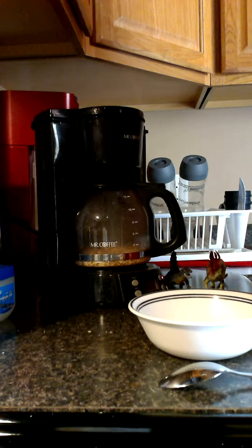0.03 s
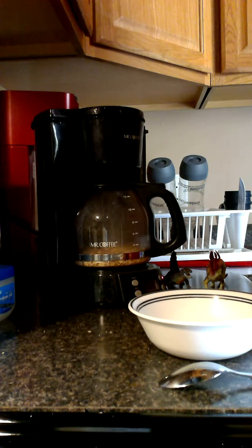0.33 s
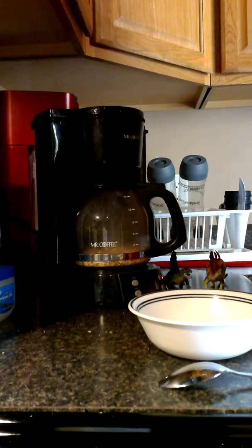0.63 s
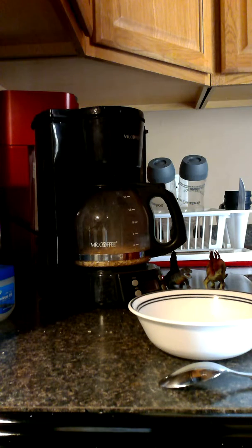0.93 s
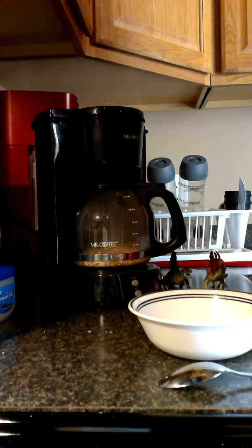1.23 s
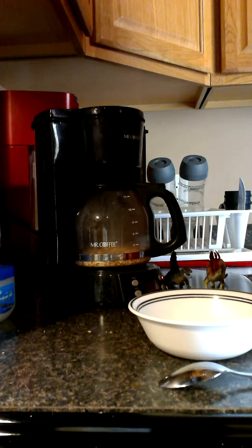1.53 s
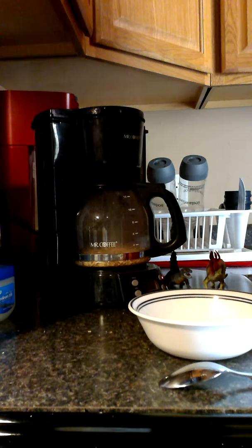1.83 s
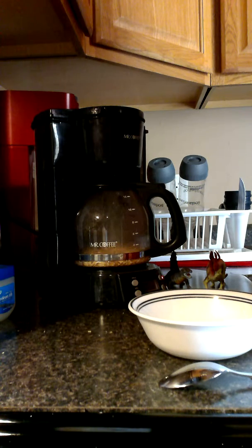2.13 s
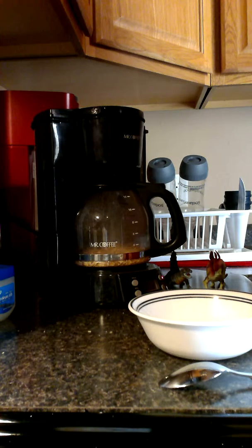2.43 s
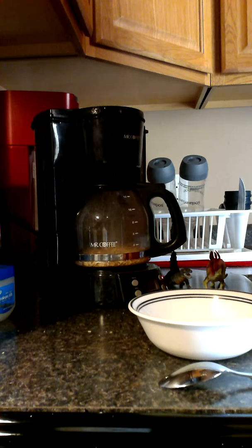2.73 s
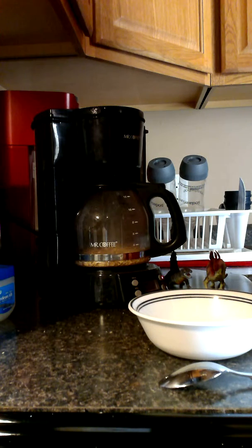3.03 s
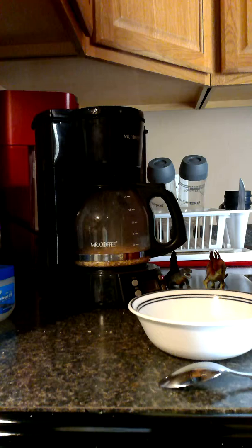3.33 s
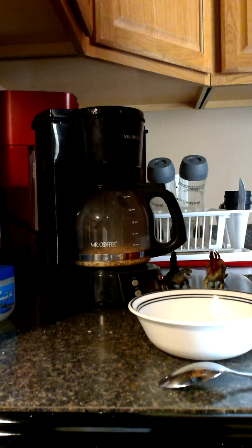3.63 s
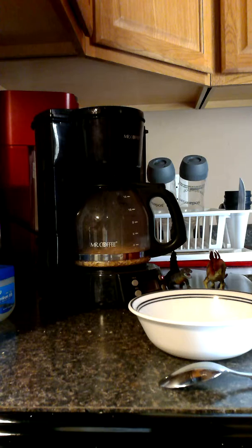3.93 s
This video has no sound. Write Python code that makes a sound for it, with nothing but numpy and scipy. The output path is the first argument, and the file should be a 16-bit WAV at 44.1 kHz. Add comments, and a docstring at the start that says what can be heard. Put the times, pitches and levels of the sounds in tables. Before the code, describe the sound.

A drip coffeemaker gurgles as it brews, its low, hollow bubbles popping in uneven clusters with light ticks and spatter. Faint steam puffs come and go. It is heard close, slightly to the right, in a quiet kitchen.

```python
"""A stone kitchen counter under cabinets: a drip coffeemaker brews, a little to the right.
Steam bubbles burst in its water tube in uneven clusters; each thumps the hollow plastic housing,
sets the tube ringing thinly and throws spatter. Steam puffs and water squelches from the spout.
Wall, counter and cabinets reflect closely. Faint tones come and go over quiet room noise."""
import sys
import numpy as np
from scipy import signal
from scipy.fft import rfft, irfft
from scipy.io import wavfile
from scipy.ndimage import uniform_filter1d

SR = 44100
rng = np.random.default_rng(int(sys.argv[2]) if len(sys.argv) > 2 else 0)


def digitize_waveform(pressure):
    """Quantize a signal to 16-bit integers and store it at the path in sys.argv[1].

    Rows of a 2-D input are taken as channels; values are limited to [-1, 1].
    """
    field = np.atleast_2d(pressure).T
    bounded = np.clip(field, -1, 1)
    quanta = np.round(bounded * 32767).astype(np.int16)
    wavfile.write(sys.argv[1], SR, quanta)


N = 176400
T = np.arange(N) / SR


def amp(db):
    """Decibels to gain."""
    return 10 ** (np.asarray(db) / 20)


def unit(x):
    """Scales to rms 1."""
    return x / np.sqrt(np.mean(x ** 2) + 1e-20)


def lookup(curve, hz):
    """Interpolates a table on a log-frequency axis."""
    knots_hz, values = np.transpose(curve)
    return np.interp(np.log(hz + 1), np.log(knots_hz + 1), values)


def colour(x, curve, db_scale=1):
    """Filters by a table of dB over frequency."""
    hz = np.fft.rfftfreq(2 * N, 1 / SR)
    return irfft(rfft(x, 2 * N) * amp(db_scale * lookup(curve, hz)))[..., :N]


def convolve(x, responses):
    """Passes mono x through one impulse response per channel."""
    return signal.fftconvolve(np.atleast_2d(x), responses, axes=1)[:, :N]


def grains(per_s, spread_db):
    """Random clicks of uneven size, rms 1."""
    clicks = (rng.random(N) < per_s / SR) * rng.choice([-1, 1], N)
    return unit(clicks * amp(spread_db * np.minimum(rng.exponential(1, N), 3)))


def add_bubble(mix, s, db, hz, decay_s=0.0045, push_hz=423, onset_cycles=0.36):
    """One bubble: a short push of air and a swing at its own pitch that holds, then stops short."""
    a, b = np.clip([int((s - 0.01) * SR), int((s + 0.06) * SR)], 0, N)
    t = T[a:b] - s
    u = np.pi * push_hz * t
    push = np.sqrt(hz / push_hz) * (1 - 3 * u ** 2) / (1 + u ** 2) ** 3
    rise = np.exp(-(np.minimum(t, 0) * hz / onset_cycles) ** 2)
    fall = np.exp(-(np.maximum(t, 0) / decay_s) ** 1.5)
    mix[a:b] += amp(db) * (push + rise * fall * np.cos(2 * np.pi * hz * t))


# Bursting bubbles. Each row: time in seconds, relative level in dB, pitch in Hz, decay in seconds.
BUBBLES = [(0.0203, -33, 240, 0.0053), (0.1266, -36, 207, 0.013), (0.1749, -38, 560, 0.0052),
           (0.1802, -38, 491.0, 0.0017), (0.1888, -35.5, 216, 0.013), (0.2199, -32.5, 240, 0.0045),
           (0.2323, -37, 240, 0.018), (0.2419, -36, 485, 0.0047), (0.3023, -33.5, 188, 0.0061),
           (0.325, -35.5, 234, 0.0091), (0.3664, -34.5, 481, 0.0056), (0.3714, -42, 388, 0.009),
           (0.4233, -39.5, 222.0, 0.014), (0.428, -40.5, 600, 0.0055), (0.4375, -45, 417, 0.017),
           (0.4547, -37.0, 220, 0.011), (0.4601, -37, 370, 0.013), (0.465, -40, 462, 0.007),
           (0.4871, -38.5, 266, 0.014), (0.548, -44.5, 241, 0.022), (0.58, -37, 208, 0.0084),
           (0.6434, -34.5, 220, 0.0097), (0.6879, -38, 420, 0.0045), (0.6956, -35.5, 217, 0.0076),
           (0.7708, -36.5, 227, 0.0093), (0.7715, -35.5, 494, 0.0024), (0.7938, -41.5, 388, 0.012),
           (0.7977, -35, 237, 0.013), (0.8622, -38.5, 560, 0.0078), (0.8692, -34, 218, 0.0098),
           (0.8788, -45, 459, 0.007), (0.9081, -35.5, 223, 0.016), (1.0309, -32.5, 219, 0.006),
           (1.0449, -33.5, 231, 0.012), (1.0998, -35.5, 224, 0.013), (1.1637, -38, 195, 0.0056),
           (1.1648, -41, 472, 0.0046), (1.2508, -35, 216, 0.02), (1.277, -37, 219, 0.012),
           (1.2856, -34.5, 485, 0.011), (1.2904, -39, 419.0, 0.014), (1.2989, -37.5, 190, 0.0064),
           (1.3097, -37, 370, 0.0032), (1.4087, -31.5, 239, 0.0052), (1.4142, -38.5, 330, 0.0038),
           (1.4387, -36.5, 414, 0.0067), (1.4708, -35, 207, 0.012), (1.5432, -38.5, 400, 0.0026),
           (1.5799, -37, 491.0, 0.0052), (1.5897, -38.5, 270, 0.009), (1.6027, -37, 183, 0.013),
           (1.6282, -36.0, 233, 0.012), (1.6503, -36.5, 497, 0.0051), (1.711, -44, 216, 0.037),
           (1.7711, -36, 488, 0.0042), (1.7756, -41.5, 262, 0.013), (1.8186, -35, 207, 0.0083),
           (1.8709, -38.5, 224, 0.016), (1.9128, -34.5, 222.0, 0.012), (2.028, -34.5, 377.0, 0.0043),
           (2.0321, -37, 210.0, 0.0093), (2.0417, -40, 483, 0.007), (2.0473, -44, 231, 0.016),
           (2.097, -40, 231, 0.011), (2.1154, -35, 538, 0.0035), (2.1237, -38, 203, 0.0074),
           (2.1339, -42.5, 534, 0.002), (2.1668, -35.5, 203, 0.0055), (2.242, -39.5, 221, 0.034),
           (2.318, -35, 209, 0.018), (2.3278, -37, 477, 0.0015), (2.3704, -41, 211, 0.012),
           (2.3934, -38, 230, 0.016), (2.4289, -36.5, 224, 0.011), (2.4698, -33.5, 232, 0.013),
           (2.5526, -46.5, 487, 0.007), (2.5561, -36.5, 477, 0.0016), (2.5571, -36, 220, 0.014),
           (2.7311, -33, 487, 0.0074), (2.736, -38.5, 407, 0.0054), (2.7601, -36.5, 232, 0.012),
           (2.7657, -39.5, 347, 0.0078), (2.7991, -33.5, 214, 0.0036), (2.8185, -36.5, 214, 0.011),
           (2.9051, -38, 410, 0.0032), (2.913, -35, 240, 0.013), (2.9746, -38, 183, 0.013),
           (2.9796, -35.5, 255, 0.015), (3.0068, -40.0, 506, 0.0098), (3.0115, -32.5, 229, 0.014),
           (3.0851, -35, 216, 0.0086), (3.191, -40.0, 390, 0.012), (3.2009, -40.5, 483, 0.01),
           (3.2169, -41.0, 224, 0.02), (3.2407, -34.5, 220, 0.01), (3.267, -39, 402, 0.0028),
           (3.3588, -34.5, 208, 0.015), (3.4079, -34, 501, 0.0086), (3.4127, -49, 418, 0.029),
           (3.4353, -40.5, 480, 0.0076), (3.4405, -36.5, 235, 0.018), (3.4477, -43, 594, 0.0059),
           (3.5563, -37, 490, 0.0077), (3.5615, -35.5, 390, 0.007), (3.6211, -38, 607.0, 0.0056),
           (3.6252, -32.5, 200, 0.01), (3.7477, -33, 388, 0.0055), (3.7558, -37.5, 226, 0.0075),
           (3.839, -33.5, 432, 0.00071), (3.8908, -37, 235, 0.01), (3.8957, -38, 353, 0.007),
           (3.927, -40, 464, 0.0026), (3.9901, -39.5, 222.0, 0.022)]
def boiling(simmer_per_s=100, simmer_db=-55, simmer_hz=320):
    """Steam bubbles burst in the tube, each trailed by two small ones, over a steady simmer."""
    out = np.zeros(N)
    for s, db, hz, decay_s in BUBBLES:
        add_bubble(out, s, db + 0.5, hz, decay_s)
        for lag, pitch in rng.random((2, 2)):
            delay_s = 0.0049 + 0.0171 * lag
            add_bubble(out, s + delay_s, db - 9, hz * np.exp(0.666 * (2 * pitch - 1)))
    candidates = 800
    for when, chance, size, pitch in rng.random((candidates, 4)):
        if chance < simmer_per_s * T[-1] / candidates:
            hz = simmer_hz * 2 ** (2 * pitch - 1)
            add_bubble(out, when * T[-1], simmer_db + 12 * (size - 0.5), hz)
    return out


# Housing response. Each row: frequency in Hz, gain in dB.
HOUSING_EQ = [(40, -25.5), (90, 3), (150, -2.5), (230, -1), (300, -1.5), (380, 0), (500, 2.5), (620, 3),
              (730, -5.5), (860, 3.5), (1080, -8), (1350, -4), (1800, 14.5), (3000, 7)]
# Cavity modes. Each row: frequency in Hz, gain in dB, T60 in seconds.
HOUSING_MODES = [(235, -21, 0.077), (411.5, -24, 0.5), (475, -12, 0.45), (531, -1, 0.59), (603, -2.5, 0.36),
                 (658, 6, 0.6), (834, -4.5, 0.015)]
def housing_thumps(bubbles):
    """Bubbles thump the plastic housing, which rings hollow and sounds into the kitchen."""
    thumps = colour(bubbles, HOUSING_EQ)
    t = T[:SR // 2]
    modes = np.zeros(len(t))
    for hz, db, t60_s in HOUSING_MODES:
        damping = np.log(1000) / t60_s
        modes += amp(db) * 2 * damping / SR * np.exp(-damping * t) * np.cos(2 * np.pi * hz * t)
    close = near_field(thumps, echo_gain=0.58) + convolve(thumps, modes[None])
    return close + amp(-12) * room_tail(thumps, onset_s=0.0097)


def ping(s, db, hz, rise_s=0.00076, decay_s=0.0073):
    """One struck resonance: a damped sine."""
    out = np.zeros(N)
    part = out[round(s * SR):][:SR // 10]
    t = T[:len(part)]
    part += amp(db) * (1 - np.exp(-t / rise_s)) * np.exp(-t / decay_s) * np.sin(2 * np.pi * hz * t)
    return out


# Strikes on the tube. Each row: start in seconds, relative level in dB, pitch in Hz.
CLINKS = [(0.019, -57.5, 3190), (0.1803, -51.5, 3110), (0.244, -56.5, 3200.0), (0.364, -62, 3060),
          (0.4331, -53.5, 3110), (0.4395, -53, 3130), (0.4707, -52, 3170), (0.6317, -57, 3210),
          (0.686, -53, 3210), (0.6899, -55.5, 3120), (0.7692, -50.5, 3220), (0.8634, -53.5, 3260),
          (0.8747, -57.5, 3150), (0.9087, -56.5, 3170), (1.0431, -50, 3186), (1.1, -57.5, 3140),
          (1.289, -48.5, 3160), (1.2987, -58, 3205.0), (1.409, -52, 3280), (1.4398, -51, 3250),
          (1.4505, -50.5, 3225), (1.5397, -49, 3310), (1.5786, -47.5, 3220), (1.6503, -50, 3195.0),
          (1.7734, -53.5, 3240), (1.9616, -54, 3180), (2.027, -56, 3195.0), (2.0399, -54.0, 3135),
          (2.1156, -51.5, 3130), (2.292, -55, 3195.0), (2.3092, -55.5, 3230), (2.556, -54, 3222),
          (2.7308, -52.5, 3160), (2.7616, -55, 3170), (2.7657, -59, 3160), (2.7927, -54, 3130),
          (2.9354, -55.5, 3170), (2.9754, -48.5, 3250), (2.9805, -48.5, 3200), (3.009, -56, 3205.0),
          (3.1898, -54, 3195.0), (3.1985, -48, 3220.0), (3.2067, -53.5, 3330), (3.2394, -48.5, 3210),
          (3.4096, -47.5, 3190), (3.435, -48.5, 3230), (3.4465, -55.5, 3140), (3.5582, -57, 3215),
          (3.6242, -50, 3240), (3.75, -63, 3160.0), (3.8384, -46.5, 3200), (3.889, -55, 3305),
          (3.9136, -53, 3170)]
def clinks():
    """The tube clinks as bursts strike it."""
    return sum(ping(s, db + 5, hz) for s, db, hz in CLINKS)


def blips(max_delay_s=0.018, range_hz=(1150, 1950)):
    """A tiny bubble blips just after each clink."""
    return sum(ping(s + rng.uniform(0, max_delay_s), db - 1, rng.uniform(*range_hz))
               for s, db, _ in CLINKS)


def burst_force(decay_s, bubble_gain_db=-23.5):
    """Force of the bursting films: a jump at each bubble and clink, then a quick decay."""
    jumps = np.zeros(N)
    for s, db, *_ in BUBBLES:
        jumps[round(s * SR)] += amp(db + bubble_gain_db) ** 2
    for s, db, _ in CLINKS:
        jumps[round(s * SR)] += amp(db) ** 2
    power = signal.lfilter([1], [1, -np.exp(-2 / (decay_s * SR))], jumps)
    return np.sqrt(power + 1e-20)


# Droplet spectrum. Each row: frequency in Hz, relative level in dB.
SPATTER_EQ = [(600, 1), (1000, 3.5), (1300, 2), (1750, 2), (2050, -5), (2650, -17.5), (3600, -7),
              (4700, -14), (6500, -17.5), (9000, -47), (16000, -53)]
def spatter():
    """Droplets from each burst patter on the plastic."""
    patter = unit(colour(grains(per_s=600, spread_db=-1.5), SPATTER_EQ))
    return amp(0.5) * patter * burst_force(decay_s=0.011)


# Tube resonances. Each row: frequency in Hz, bandwidth in Hz, relative level in dB.
TUBE_MODES = [(3210, 70, 0), (3790, 100, -12), (2210, 60, -12)]
def tube_ring(steady_db=-72.5):
    """Droplets keep the tube ringing faintly, harder at each burst."""
    force = amp(-3) * burst_force(decay_s=0.0038) + amp(steady_db)
    drive = grains(per_s=3000, spread_db=3.5) * force
    t = T[:SR // 10]
    response = sum(amp(db) * np.sqrt(width) * np.exp(-np.pi * width * t) * np.sin(2 * np.pi * hz * t)
                   for hz, width, db in TUBE_MODES)
    return signal.fftconvolve(drive, response / np.linalg.norm(response))[:N]


# Drop impacts. Each row: start in seconds, relative level in dB.
TICKS = [(.1795, -54), (.2, -70), (.369, -64), (.44, -57), (.69, -62), (.865, -59), (1.042, -56.5),
         (1.099, -58.5), (1.314, -59), (1.58, -59), (1.652, -74), (2.732, -60), (3.838, -62)]
# Modes of the plastic. Each row: frequency in Hz, gain in dB.
PLASTIC_MODES = [(3760, 3), (4200, -8), (4680, 0), (5540, -15), (6330, -3)]
def ticks(spread_db=2, detune=0.0084):
    """Drops tick on the plastic, ringing it a little differently each time."""
    out = np.zeros(N)
    for s, db in TICKS:
        for hz, mode_db in PLASTIC_MODES:
            level_db = db + mode_db + spread_db * rng.standard_normal()
            out += ping(s, level_db, hz * (1 + detune * rng.standard_normal()))
    return out


# Spout squelches. Each row: start in seconds, peak level in dB, centre pitch in Hz.
SQUELCHES = [(0.645, -48, 1536), (1.313, -49, 1650), (2.06, -55, 1570), (2.3, -51.5, 1446),
             (2.798, -54, 1830), (2.981, -48, 1756)]
def squelches(length_s=0.02, glide=0.043, roughness=0.089):
    """Water squeezed through the spout gives short, rough, slightly rising whistles."""
    out = np.zeros(N)
    progress = np.linspace(0, 1, round(length_s * SR))
    swell = np.sin(np.pi * progress ** 0.71)
    for s, db, hz in SQUELCHES:
        waver = unit(uniform_filter1d(rng.standard_normal(SR // 5), size=60))[:len(swell)]
        pitch_hz = hz * (1 + glide * (progress - 0.5) + roughness * waver)
        whistle = np.sin(2 * np.pi * np.cumsum(pitch_hz) / SR)
        out[round(s * SR):][:len(swell)] += amp(db) * swell * whistle
    return out


# Steam puffs. Each row: start and length in seconds, then relative sputter, hiss and fizz in dB.
PUFFS = [(0.169, 0.043, -57, -88, -75), (0.312, 0.048, -61, -77.5, -84), (0.423, 0.044, -63, -79, -76),
         (0.635, 0.026, -53, -72, -74), (0.87, 0.029, -62, -87, -84), (1.032, 0.0087, -66, -87, -80),
         (1.16, 0.037, -65, -76, -70), (1.296, 0.029, -58, -70.5, -71), (1.355, 0.062, -64.5, -72, -65.5),
         (1.408, 0.056, -76, -75.5, -79), (1.52, 0.087, -60, -77.5, -91), (1.949, 0.019, -67, -63.5, -70),
         (2.041, 0.015, -54.5, -67.5, -73), (2.292, 0.031, -57.5, -70, -72),
         (2.788, 0.012, -52.5, -75, -78), (2.968, 0.028, -53, -69, -71), (3.194, 0.007, -51.5, -57.5, -58),
         (3.374, 0.044, -61.5, -69, -85), (3.558, 0.013, -51, -67, -68), (3.621, 0.079, -67, -80, -74),
         (3.688, 0.04, -60, -68, -65.5), (3.739, 0.12, -63.5, -81, -73.5)]
# Spectra of the three parts. Each row: frequency in Hz, relative level in dB.
SPUTTER_EQ = [(400, -17), (1000, -2.5), (1600, -4.5), (2300, -6), (3200, -14.5), (4500, -21), (9000, -55)]
HISS_EQ = [(1500, -7), (3000, -9.5), (3900, 7), (5400, 1.5), (6900, 3.5), (8500, -22), (16000, -37)]
FIZZ_EQ = [(3000, -18), (6000, 2), (7500, 6.5), (10000, 8), (12500, 2.5), (15000, 4.5)]
def steam_puffs(rise_s=0.0052, fall_s=0.011):
    """Steam leaves the spout in puffs of wet sputter, hiss and fizz that rise fast, hold and die."""
    out = np.zeros(N)
    for part, (spectrum, gain_db) in enumerate([(SPUTTER_EQ, 0.5), (HISS_EQ, 9.5), (FIZZ_EQ, 7)]):
        power = np.zeros(N)
        for s, length_s, *levels_db in PUFFS:
            rise = np.clip((T - s) / rise_s, 0, 1)
            fall = np.exp(-np.maximum(T - s - 0.84 * length_s, 0) / fall_s)
            power += (amp(levels_db[part]) * rise * fall) ** 2
        noise = unit(colour(grains(per_s=4500, spread_db=2.5), spectrum))
        out += amp(gain_db) * np.sqrt(power) * noise
    return out


# Course of the jet. Each row: time in seconds, band centre in Hz, level in dB.
JET_PATH = [(1.349, 7470, -90), (1.362, 7400, -62), (1.385, 7000, -69), (1.405, 5200, -69),
            (1.46, 4750, -64.5), (1.54, 4100, -72), (1.6, 4040, -90)]
def steam_jet(width_hz=1500):
    """One long, sputtering jet whose hiss sinks as the pressure falls."""
    s, hz, db = np.transpose(JET_PATH)
    pole = np.exp(-np.pi * width_hz / SR)
    baseband = signal.lfilter([1], [1, -2 * pole, pole ** 2], grains(per_s=2900, spread_db=-2))
    carrier = np.cos(2 * np.pi * np.cumsum(np.interp(T, s, hz)) / SR)
    return unit(baseband * carrier) * np.interp(T, s, amp(db), left=0, right=0)


# Reflections at each microphone. Each row: delay in seconds, relative gain.
ECHOES_LEFT = [(.0023, 0.31), (.0031, -0.31), (.0047, 0.38), (.0083, 0.35), (.01, 0.19), (.0125, 0.18),
               (.0167, 0.25), (.0186, 0.22)]
ECHOES_RIGHT = [(.0028, -0.019), (.0051, 0.58), (.0064, 0.091), (.0083, 0.11), (.0099, -0.24),
                (0.0103, 0.2), (0.0187, 0.22), (0.023, 0.15)]
def near_field(x, echo_gain, direct_gain=0.8):
    """Direct sound plus single reflections from counter, wall and cabinets."""
    taps = np.zeros((2, SR // 20))
    taps[:, 0] = direct_gain
    for side, echoes in enumerate((ECHOES_LEFT, ECHOES_RIGHT)):
        for delay_s, gain in echoes:
            taps[side, round(delay_s * SR)] += echo_gain * gain
    return convolve(x, taps)


# Kitchen decay. Each row: frequency in Hz, T60 in seconds.
ROOM_T60 = [(100, 1), (250, 0.7), (1000, 0.51), (3200, 0.47), (8000, 0.23), (16000, 0.4)]
def room_tail(x, onset_s):
    """Diffuse reverberation, each band dying at its own rate."""
    hz, t, bands = signal.stft(diffuse_noise()[:, :SR // 2], SR, nperseg=256)
    decay = amp(-60 * t / lookup(ROOM_T60, hz)[:, None])
    _, tail = signal.istft(bands * decay, SR, nperseg=256)
    tail *= np.minimum(T[:tail.shape[1]] / onset_s, 1) ** 2
    return convolve(x, tail / np.linalg.norm(tail[0]))


# Stereo balance. Each row: frequency in Hz, leftward bias in dB before scaling per side.
BALANCE = [(100, -3), (230, 0), (400, -5.5), (490, 3.5), (580, -7), (900, -8), (1250, 1.5), (1800, -4),
           (3200, -7), (4500, -5.5), (8000, -10.5), (15000, -2)]
def lean_right(stereo):
    """Most bands reach the right microphone louder."""
    left, right = stereo
    return np.array([colour(left, BALANCE, db_scale=0.68), colour(right, BALANCE, db_scale=-0.42)])


# Tones under the bubbling. Each row: start in seconds, length in seconds, level in dB, pitch in Hz.
TONES = [(2.199, 0.98, -61, 335), (3.14, 1.7, -62.5, 703), (0, 0.63, -64.5, 706),
         (2.202, 0.46, -69.5, 1326), (2.327, 0.12, -69, 1673), (2.83, 0.4, -71, 1660)]
def faint_tones(waver_hz=2.36):
    """Slightly wavering tones fade in and out."""
    out = np.zeros(N)
    for s, length_s, db, hz in TONES:
        pitch_hz = hz + waver_hz * unit(uniform_filter1d(rng.standard_normal(N), size=3000))
        tone = unit(np.sin(2 * np.pi * np.cumsum(pitch_hz) / SR))
        progress = np.clip((T - s) / length_s, 0, 1)
        out += amp(db) * tone * np.sqrt(abs(np.sin(np.pi * progress)))
    return out


# Room sound field. Each row: frequency in Hz, left-right correlation from 0 to 1.
CORRELATION = [(20, 0.85), (100, 1), (300, 0.97), (700, 0.012), (1500, 0.67), (4000, 0), (16000, 0)]
def diffuse_noise():
    """Stereo noise, alike in the bass and unrelated in the treble."""
    left, other = rfft(rng.standard_normal((2, N)))
    shared = lookup(CORRELATION, np.fft.rfftfreq(N, 1 / SR))
    right = shared * left + np.sqrt(1 - shared ** 2) * other
    return irfft(np.array([left, right]), N)


# Noise floor. Each row: frequency in Hz, relative level in dB.
FLOOR_EQ = [(10, 1.9), (22, 8), (48, -5), (90, -4), (160, -1), (220, 0.7), (300, -8), (480, -3), (800, -9),
            (1100, -15), (1700, -15), (2600, -23), (4000, -22), (8000, -25), (15500, -24)]
def background(floor_db=-59.5, whine_db=-90, whine_hz=14700):
    """Room rumble, microphone hiss and a very faint high whine."""
    floor = amp(floor_db) * unit(colour(diffuse_noise(), FLOOR_EQ))
    return floor + amp(whine_db) * np.sin(2 * np.pi * whine_hz * T)


def scene():
    """The coffeemaker, right of centre, over the background."""
    treble = spatter() + tube_ring() + clinks() + ticks() + blips()
    treble += squelches() + steam_puffs() + steam_jet()
    close = near_field(treble, echo_gain=0.6)
    close[0] = np.roll(close[0], 3)  # left arrives 3 samples later
    machine = housing_thumps(boiling()) + close + amp(-9) * room_tail(treble, onset_s=0.00035)
    return lean_right(machine) + faint_tones() + background()


def record(dry, cutoff_hz=15830):
    """Steep low-pass band limit."""
    lowpass = signal.firwin(701, cutoff_hz, window=("kaiser", 8), fs=SR)
    return signal.oaconvolve(dry, lowpass[None], "same")


dry = scene()
out = record(dry)
digitize_waveform(out)
```